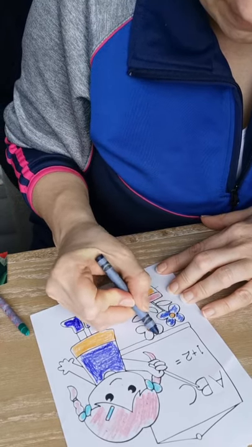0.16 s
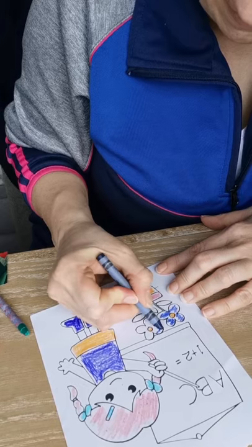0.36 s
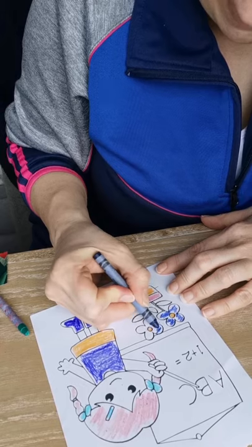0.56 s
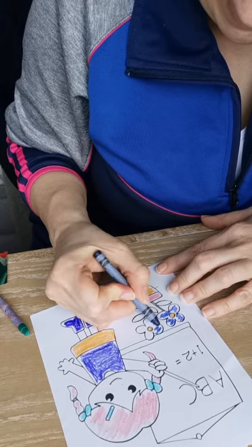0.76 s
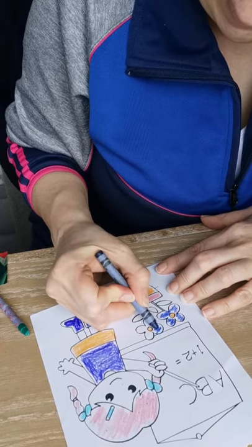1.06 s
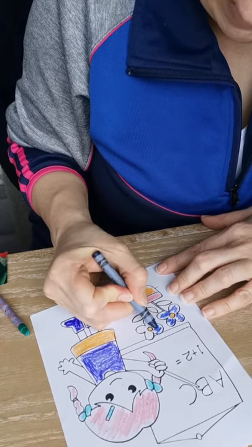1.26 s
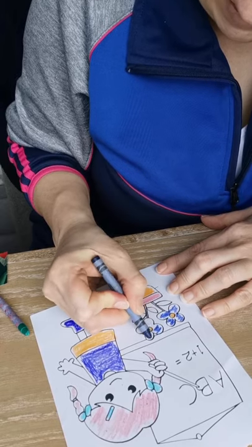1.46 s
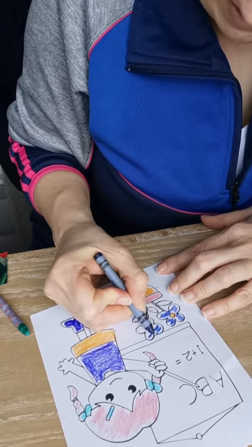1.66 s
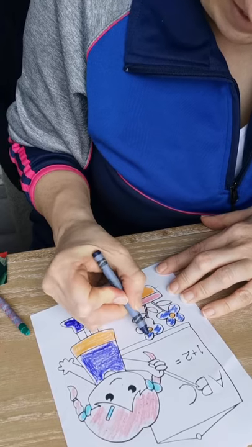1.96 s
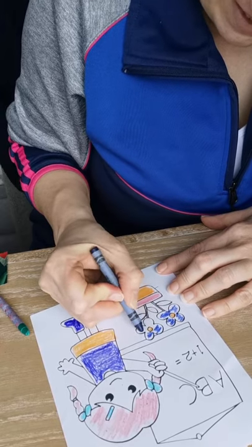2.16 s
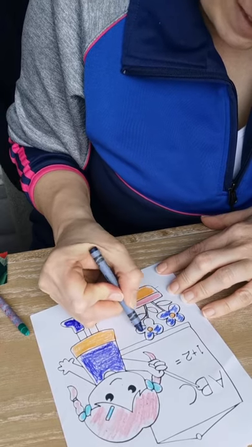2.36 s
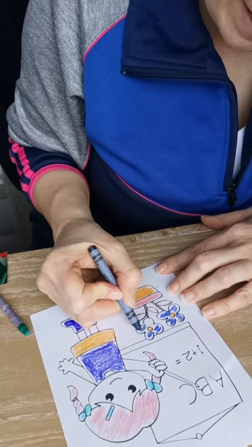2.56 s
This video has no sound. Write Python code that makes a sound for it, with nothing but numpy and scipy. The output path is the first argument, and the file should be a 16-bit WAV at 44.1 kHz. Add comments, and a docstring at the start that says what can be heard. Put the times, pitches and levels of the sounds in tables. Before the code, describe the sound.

A wax crayon colours on paper on a wooden desk, close by in a quiet room. A brief swish leads to a sharp knock of the tip at 0.2 seconds. Short, uneven back-and-forth strokes rasp until 1.4 seconds, with a soft desk rumble and tiny ticks. After a short pause, a second knock comes at 1.5 seconds. Strokes resume until about 2.7 seconds, with a duller knock at 2.3.

```python
"""Crayon colouring on a desk

A wax crayon colours small shapes on a sheet of paper that lies on a wooden desk, in a quiet room.
A brief swish over the paper comes first. Then short back-and-forth strokes rasp over the paper's grain
and make the desk top rumble. Three times the tip is set down with a sharp knock, and now and then
the wax catches on the paper with a tiny tick."""
import sys
import numpy as np
from scipy import signal
from scipy.fft import rfft, irfft
from scipy.io import wavfile

SR = 44100
rng = np.random.default_rng(int(sys.argv[2]) if len(sys.argv) > 2 else 0)


def wav_record(signal):
    """Record a signal, one row per channel, as 16-bit PCM in the file named by sys.argv[1]."""
    frames = np.transpose(np.atleast_2d(signal))
    bounded = np.clip(frames, -1, 1)
    # unit amplitude maps onto the largest positive 16-bit level
    quanta = np.round(bounded * 32767).astype(np.int16)
    wavfile.write(sys.argv[1], SR, quanta)


N = 119070
TIME = np.arange(N) / SR
BINS_HZ = np.maximum(np.arange(N // 2 + 1) * SR / N, 1)

# A "colour" says how strong low and high pitches are compared with each other.
# "Pan" is the left level minus the right level.
# colour of the steady room noise: f/Hz, level/dB
ROOM_NOISE_COLOUR = [(20, -24.5), (46, 2.5), (70, -9.5), (110, -1.5), (200, -14.5), (300, -24),
                     (600, -26.5), (1200, -31.5), (3500, -35), (8000, -41.5), (11000, -37), (16000, -41)]
# the swish over the paper: start t/s, length/s, level/dB
SWISH_MOVE = (0.037, 0.14, -55.5)
# colour of the swish: f/Hz, level/dB
SLIDE_COLOUR = [(400, -21), (1000, -7), (1700, -12.5), (2300, -5), (3500, -8), (4700, -2.5), (6800, 3.5),
                (9500, -4.5), (12000, 0.5), (16000, -10.5)]
# wax catching on the paper: t/s, level/dB
WAX_TICKS = [(0.199, -54.5), (0.577, -56.5), (0.589, -64.5), (1.5032, -66), (1.5315, -51.5), (2.3235, -61),
             (2.4147, -52.5), (2.418, -57.5), (2.607, -52)]
# colour of a tick: f/Hz, level/dB
WAX_COLOUR = [(500, -32), (2000, -20), (4000, -11), (7000, 2), (9500, -2), (13000, -0.5), (16000, -10.5)]
# the tip is set down: t/s, level/dB, cut-off f/Hz (higher is harder), share of the ring time left
TIP_KNOCKS = [(0.1996, -36, 3350, 0.74), (1.5336, -34.5, 4420, 0.61), (2.326, -37, 1770, 0.67)]
# the desk top's own tones, with the crayon on it: f/Hz, level/dB, free time to fade by 60 dB/s, pan/dB
DESK_TONES = [(47, -10.5, 0.44, -2), (96.6, -7, 0.93, 1.5), (112.4, -9, 0.57, -2.5), (132.93, 2, 0.5, 1),
              (173.7, -1, 0.32, 0), (207.9, 3, 0.32, -2.5), (265, -27, 0.22, -12), (357.5, -2, 0.14, 0.5),
              (574.6, -8, 0.22, -7.5), (711, -14, 0.097, 22.5), (858, -10, 0.081, 1),
              (1159, -7.5, 0.1, -12), (2105, -2, 0.036, -11), (2335, 2, 0.039, -11), (2884, -12, 0.055, -4),
              (4340, -4, 0.042, 1), (5280, -10.5, .06, -14)]
# colour of the wood's many short, crowded tones: f/Hz, level/dB
WOOD_COLOUR = [(60, -38), (250, 8.5), (380, -1.5), (480, -29), (640, 1), (780, -5), (980, -16.5), (1170, 1),
               (1400, -10.5), (1750, -9.5), (2050, -0.5), (2420, -3), (2750, -7), (3200, -8.5), (3700, -21),
               (4500, -8.5), (5400, -8), (6200, -16), (7300, 0.5), (10000, -21.5), (16000, -40)]
# colour of the low boom that the room holds longest: f/Hz, level/dB
BOOM_COLOUR = [(100, -23), (220, 4.5), (380, 1), (520, 0.5), (650, -5), (1000, -6.5), (3000, -50)]
# crayon strokes: start t/s, length/s, then relative level/dB of hiss, scrape and rumble
CRAYON_STROKES = [(0.204, 0.049, 5.5, 0, -8), (0.258, 0.06, -3, 2.5, 17), (0.338, 0.081, 0.5, 3, 9),
                  (0.416, 0.096, -13, -6.5, 1), (0.512, 0.11, -5.5, -3, -5), (0.608, 0.082, -5, -7.5, -36),
                  (0.69, 0.087, -1.5, 4, -0.5), (0.762, 0.1, -5.5, -2.5, -15), (.855, 0.045, 4, 5, 17.5),
                  (0.888, .058, 4.5, 9, 8), (0.959, 0.081, -8.5, -4, -4), (1.06, 0.044, -5.5, -2, -19),
                  (1.122, 0.088, -9.5, -1, 3), (1.201, 0.093, -11.5, -2.5, 3.5),
                  (1.289, 0.085, -6.5, -8, -7.5), (1.612, 0.059, 5, 8.5, 18.5), (1.663, 0.13, -9, -1.5, -5),
                  (1.801, 0.0687, 4.5, 4.5, 5), (1.861, 0.12, -7, -3.5, -4.5), (1.968, 0.075, 2, 3, 1.5),
                  (2.07, 0.064, -3, -0.5, -18), (2.173, 0.12, -3, -4, -5.5), (2.355, 0.086, -2, 5, 6),
                  (2.427, 0.13, -4, -3, 2), (2.549, 0.093, 0, 3.5, -21), (2.629, 0.078, -0.5, 0.5, 13)]
# colour of wax hissing on the paper's fibres: f/Hz, level/dB
HISS_COLOUR = [(1000, -14.5), (3000, -5), (3800, -5.5), (5200, 0.5), (6200, -2.5), (7300, 4.5), (9000, -7),
               (12000, -4.5), (16000, -8)]
# colour of the scrape carried by crayon and wood: f/Hz, level/dB
SCRAPE_COLOUR = [(100, -1), (350, 10.5), (600, 6.5), (980, -6.5), (1170, 14), (1380, -4.5), (1700, 2),
                 (1850, -11), (2060, 8), (2200, 0), (2360, 3), (3000, -5.5), (4200, -12.5), (8000, -20)]
# soft pushes on the desk where the hand turns: t/s, level/dB
HAND_PUSHES = [(0.448, -48), (0.533, -50), (0.571, -58.5), (0.699, -44.5), (.755, -49.5), (0.863, -52.5),
               (.970, -43), (0.999, -50), (1.029, -62), (1.132, -47.5), (1.361, -77), (1.802, -48.5),
               (1.995, -49.5), (2.153, -47.5), (2.182, -46), (2.561, -50), (2.591, -47)]


def from_db(db):
    """Turn decibels into a number to multiply by."""
    return 10 ** (np.asarray(db) / 20)


def rms_one(x):
    """Scale a signal so that its average strength (rms) is 1."""
    return x / np.sqrt(np.mean(x ** 2) + 1e-20)


def panned(db):
    """Left and right gains; a negative pan moves the sound to the right."""
    return from_db(np.array([[.5], [-.5]]) * db)


def low_pass(x, hz, order=2):
    """Dull a sound by turning down what lies above hz."""
    return signal.sosfilt(signal.butter(order, hz, fs=SR, output="sos"), x + 1e-18)


def coloured(noise, colour):
    """Give a steady noise a colour, at strength 1."""
    hz, db = np.array(colour).T
    gain = from_db(np.interp(np.log(BINS_HZ), np.log(hz), db))
    return rms_one(irfft(rfft(noise) * gain, N))


def stereo(pair, likeness):
    """Mix two unrelated signals into left and right: likeness 0 is wide, 1 is the same on both sides."""
    middle = np.sqrt((1 + likeness) / 2) * pair[0]
    side = np.sqrt((1 - likeness) / 2) * pair[1]
    return np.array([middle + side, middle - side])


def swell(start, length, rise_s, fall_s):
    """The smooth rise and fall of one hand movement."""
    edge = np.clip((TIME - start) / rise_s, 0, 1) * np.clip((start + length - TIME) / fall_s, 0, 1)
    return np.sin(edge * np.pi / 2)


def through(force, response):
    """Shake an object: every moment of the force sets off the object's ringing response."""
    return signal.fftconvolve(force[None], response, axes=1)[:, :N]


def room_noise(level_db=-63, treble_pan_db=-2, alike_below_hz=270):
    """The quiet room: a low rumble, alike on both sides, under a faint wide hiss."""
    likeness = 1 / (1 + (BINS_HZ / alike_below_hz) ** 2)
    spectrum = stereo(rfft(rng.standard_normal((2, N))), likeness)
    spectrum *= panned(treble_pan_db * (1 - likeness))
    return from_db(level_db) * coloured(irfft(spectrum, N), ROOM_NOISE_COLOUR)


def slips(per_second=14000, spread_db=1):
    """Two random streams of clicks, each click a tiny slip over the paper's fibres."""
    sizes = from_db(spread_db * np.minimum(rng.exponential(1, (2, N)), 5))
    signs = rng.choice([-1, 1], (2, N))
    return sizes * signs * (rng.random((2, N)) < per_second / SR)


def with_echoes(x, count=8, echo_db=-7, latest_s=0.006):
    """Nearby surfaces add a few quick echoes, different ones on each side."""
    delays = (rng.uniform(0.082, 1, (2, count)) * latest_s * SR).astype(int)
    echoes = [sum(np.roll(side, delay) for delay in row) for side, row in zip(x, delays)]
    return x + from_db(echo_db) * np.array(echoes)


def rubbing(colour, pan_db):
    """Rubbing on paper: thousands of slips a second blur into a steady noise."""
    rasp = with_echoes(stereo(slips(), likeness=0.87))
    return coloured(rasp, colour) * panned(pan_db)


def swish():
    """A light, quick slide across the sheet."""
    start, length, db = SWISH_MOVE
    shape = swell(start, length, rise_s=0.037, fall_s=0.075) ** 2
    return rubbing(SLIDE_COLOUR, pan_db=-8) * shape * from_db(db)


def ticks(fade_s=0.022):
    """Wax catches and lets go in a short burst of slips."""
    level = sum((TIME >= s) * from_db(db - 60 * np.abs(TIME - s) / fade_s) for s, db in WAX_TICKS)
    return rubbing(WAX_COLOUR, pan_db=-9.5) * level


def blow(s, db, cut_hz, order):
    """The force of one touch at time s: the softer the touch, the duller it is."""
    spike = from_db(db) * (np.arange(N) == int(s * SR))
    return low_pass(spike, cut_hz, order)


def desk_ring(ring_share, rise_cycles=0.051):
    """After a blow the desk top dips and rings; the hand leaves it only a share of its ring time."""
    t, ring = TIME[:SR], 0
    for hz, db, fade_s, pan_db in DESK_TONES:
        onset = np.expm1(-hz * t / rise_cycles)  # a tone takes part of a cycle to start
        level = from_db(db - 60 * t / (fade_s * ring_share))
        ring += panned(pan_db) * level * onset * np.cos(2 * np.pi * hz * t)
    return ring


def wood_and_room(wood_fade_s=0.039, room_fade_s=0.28, boom_fade_s=0.39):
    """The wood's crowded tones die fast as a clack; the room echoes it and holds a low boom longest."""
    t = TIME[:SR]
    wood = coloured(stereo(rng.standard_normal((2, N)), likeness=0.2), WOOD_COLOUR)[:, :SR]
    room = coloured(rng.standard_normal((2, N)), WOOD_COLOUR)[:, :SR]
    boom = coloured(rng.standard_normal((2, N)), BOOM_COLOUR)[:, :SR]
    return (wood * from_db(5 - 60 * t / wood_fade_s) * panned(db=-3)
            + room * from_db(-9.5 - 60 * t / room_fade_s) * panned(db=-5.5)
            + boom * from_db(-13 - 60 * t / boom_fade_s))


def knocks():
    """The tip knocks on the desk through the paper."""
    clack = wood_and_room()
    return sum(through(blow(s, db, cut_hz, order=4), desk_ring(ring_share) + clack)
               for s, db, cut_hz, ring_share in TIP_KNOCKS)


def strokes(desk, hiss_db=-68.5, scrape_db=-70, rumble_db=-59.5, judder_db=2):
    """Each stroke hisses and scrapes on the paper, while its uneven drag makes the desk rumble."""
    shapes = np.array([swell(s, length, rise_s=0.055, fall_s=0.04) for s, length, *_ in CRAYON_STROKES])
    gains = from_db(np.array(CRAYON_STROKES)[:, 2:].T)
    hiss_level, scrape_level, drag_level = gains @ shapes  # add the strokes into three loudness curves
    wobble = rms_one(low_pass(rng.standard_normal(N), hz=68.6))
    judder = from_db(judder_db * wobble)  # the rasp flickers quickly in loudness
    hiss = rubbing(HISS_COLOUR, pan_db=-9) * hiss_level * from_db(hiss_db)
    scrape = rubbing(SCRAPE_COLOUR, pan_db=-8) * scrape_level * from_db(scrape_db)
    drag = low_pass(rng.standard_normal(N) * drag_level, hz=163, order=3)
    rumble = from_db(rumble_db) * rms_one(through(drag, desk))
    return (hiss + scrape) * judder + rumble


def pushes(desk):
    """Where the hand turns, it gives the desk a soft, dull push."""
    force = sum(blow(s, db, cut_hz=131, order=3) for s, db in HAND_PUSHES)
    return through(force, desk)


def scene():
    """Crayon, paper and desk in the quiet room."""
    pressed_desk = desk_ring(ring_share=0.5)
    return room_noise() + swish() + ticks() + knocks() + strokes(pressed_desk) + pushes(pressed_desk)


def record(dry):
    """Cut away the very highest treble steeply."""
    cutoff_hz = 16200
    return signal.sosfilt(signal.ellip(10, .1, 70, cutoff_hz, fs=SR, output="sos"), dry)


dry = scene()
out = record(dry)
wav_record(out)
```